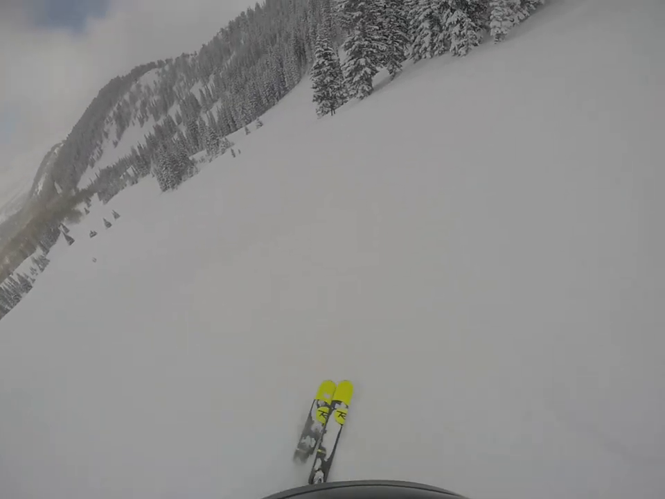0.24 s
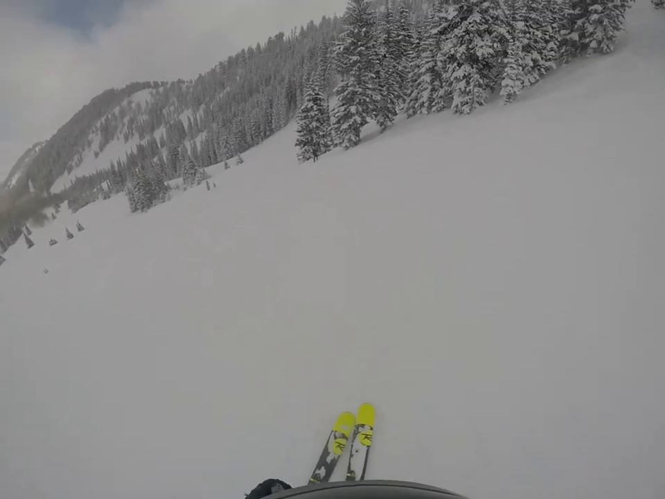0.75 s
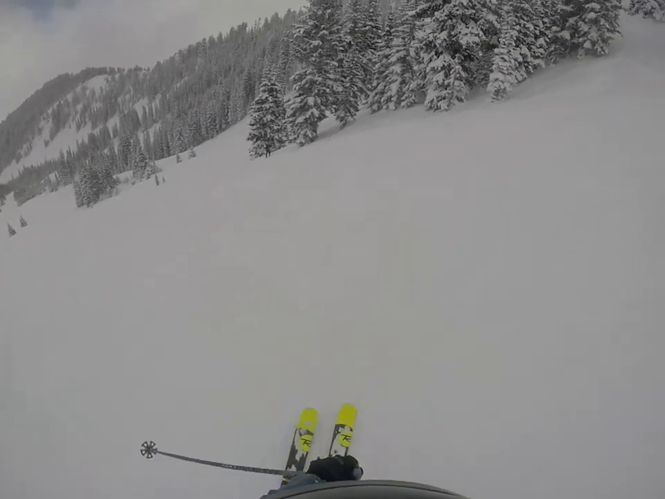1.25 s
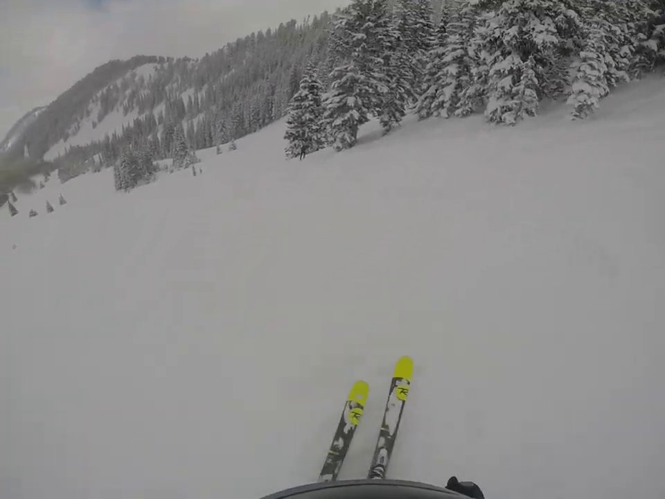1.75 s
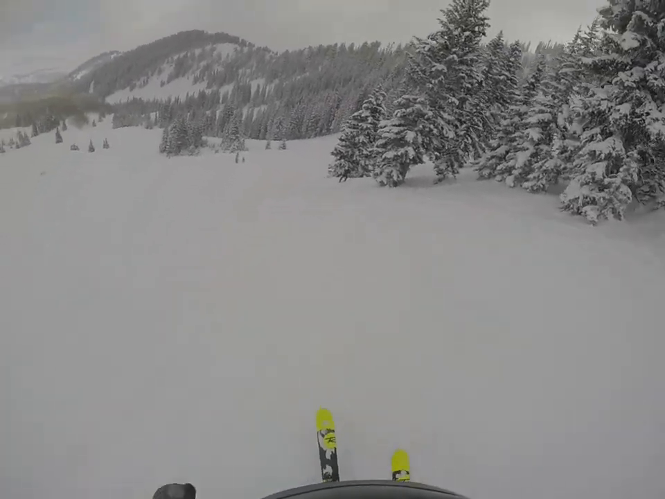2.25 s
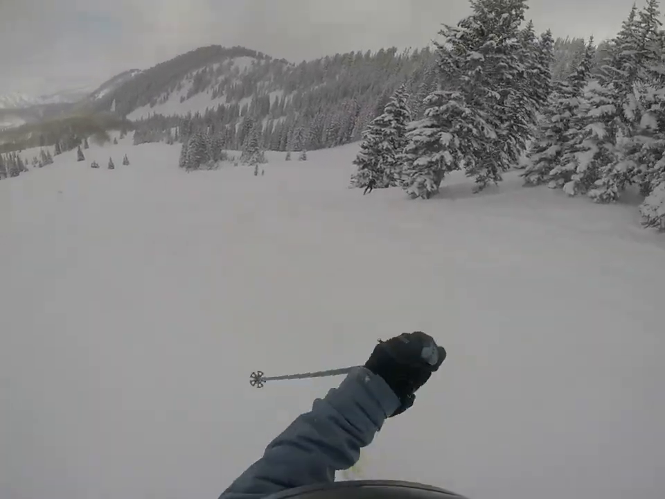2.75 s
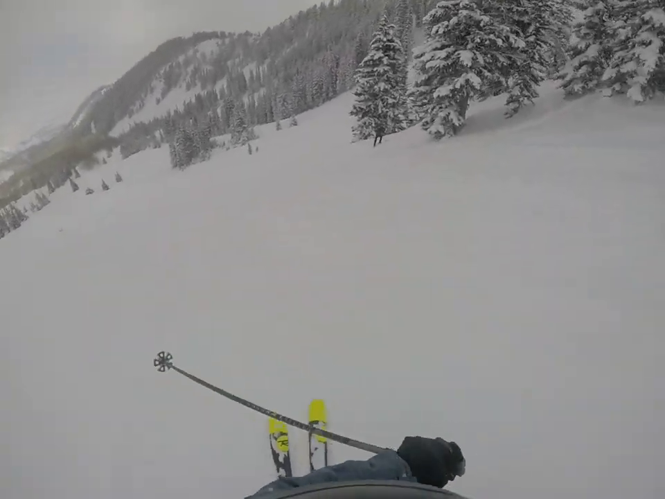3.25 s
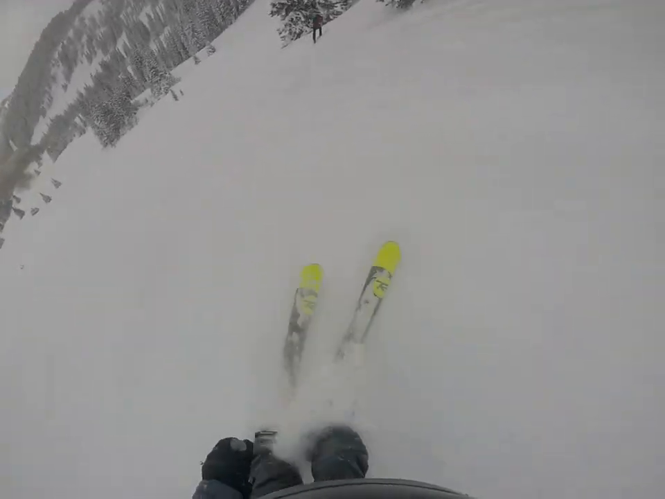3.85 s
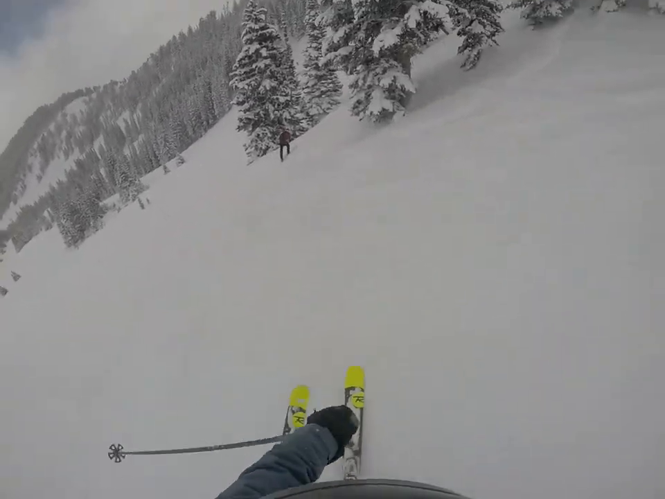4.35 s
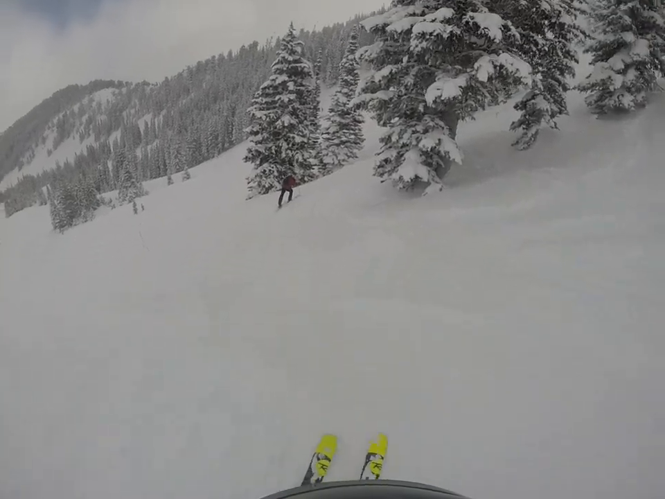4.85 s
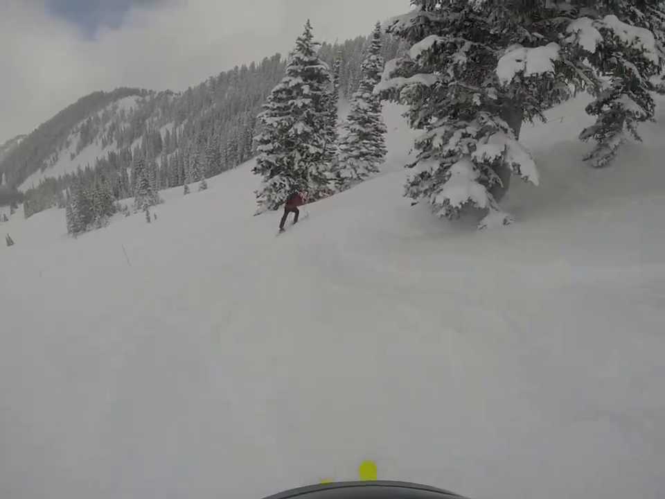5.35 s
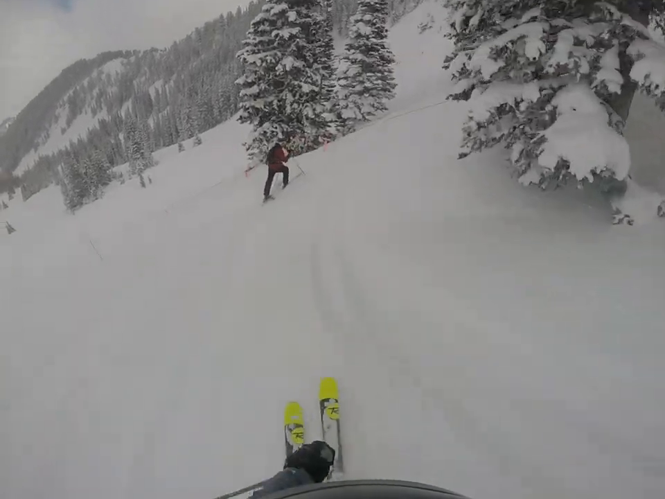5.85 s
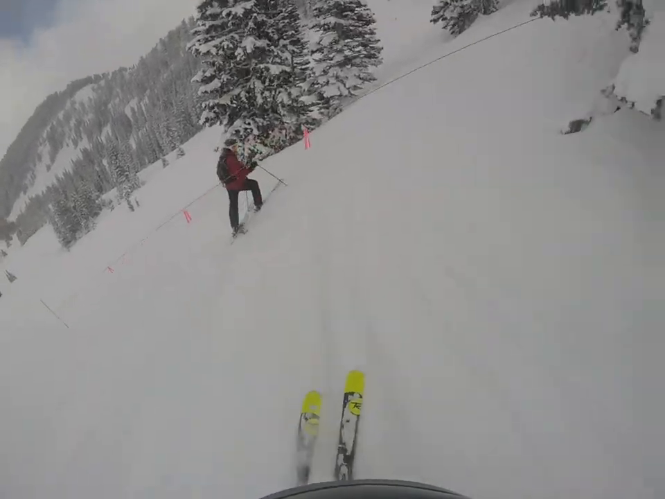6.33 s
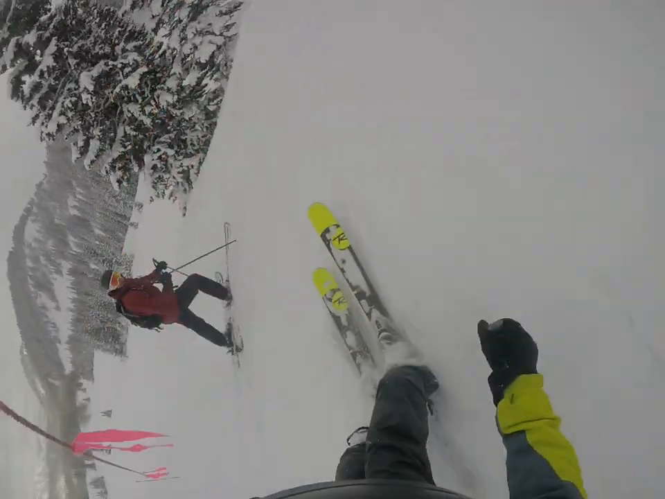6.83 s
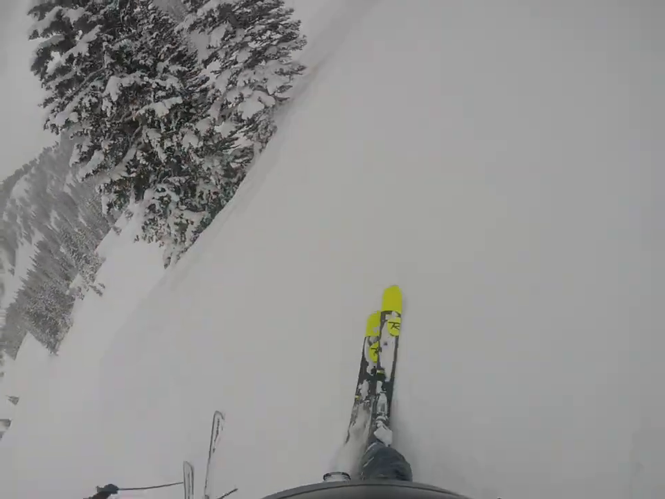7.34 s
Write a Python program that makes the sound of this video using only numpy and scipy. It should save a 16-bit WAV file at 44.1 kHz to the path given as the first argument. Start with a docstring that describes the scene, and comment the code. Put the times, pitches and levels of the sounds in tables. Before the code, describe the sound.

Muffled snow spray rushes and thins over rumbling, thudding wind, dotted with tiny sharp clicks; the hiss nearly vanishes before a small binding knock.

```python
"""On an open snowy slope, skis run through deep powder, heard by a microphone in a closed camera housing on a helmet.
Sprayed snow is a dense rain of random grains, coloured by the hollow of the housing.
Wind is slow and quick noise swelling into thumps on the wall; rushing air adds a rush, drone, whistle and hiss.
Ice crystals and the mount tick against the plastic by setting its rings going, and near the end
the ski binding knocks, made the same way with its own ringing pitches."""
import sys
import numpy as np
from scipy import signal
from scipy.fft import rfft, irfft, next_fast_len
from scipy.io import wavfile
from scipy.ndimage import uniform_filter1d

SR = 44100
rng = np.random.default_rng(int(sys.argv[2]) if len(sys.argv) > 2 else 0)


def wav_out(sig):
    """Save sig, one row per channel (or a flat mono array), as 16-bit PCM at SR to the path in sys.argv[1]."""
    wavfile.write(sys.argv[1], SR, np.round(np.clip(np.atleast_2d(sig).T, -1, 1) * 32767).astype(np.int16))


def ratio_of_db(decibels):
    """Turn decibels (scalar or array-like) into linear amplitude factors; 0 dB maps to 1."""
    return 10 ** (np.asarray(decibels, float) / 20)


N = 334719

# How the snow spray changes. Each row: time in seconds, hiss level in dB, brightness (treble boost) in dB.
SPRAY_OVER_TIME = [(0.0, -42.5, -1), (0.19, -43.5, 2.5), (0.33, -37.5, 3), (0.56, -44.5, 1.5),
                   (0.74, -41, 0.5), (1.15, -43, 1.5), (1.38, -47, -3), (1.5, -53, 0), (1.56, -52, 8),
                   (1.58, -45.5, -1.5), (1.85, -49.5, 3), (2.45, -47, -2), (2.94, -43, 0.5), (3.1, -42, 1),
                   (3.38, -36.5, 1), (3.6, -47.5, 2), (3.72, -39.5, 0.5), (3.85, -45.5, 1),
                   (3.92, -60.5, 7), (4.05, -62.5, -3), (4.14, -52, -3.5), (4.47, -59.5, -7),
                   (4.62, -48.5, -11), (4.87, -49, 0), (5.32, -55.5, 0.5), (5.72, -47.5, -2),
                   (5.9, -48, -5), (5.97, -56, 0), (6.23, -47.5, -2), (6.46, -55, -2.5), (6.94, -59, 2),
                   (7.0, -67.5, 4), (7.59, -69.5, 5)]


def rms_one(x):
    """Scale a sound so that its rms (average strength) is 1."""
    return x / np.sqrt(np.mean(x ** 2) + 1e-20)


def in_time(rows):
    """Draw straight lines between the rows of a table: one value per sample for each column."""
    s, *columns = np.transpose(rows)
    return [np.interp(np.arange(N) / SR, s, column) for column in columns]


def coloured(x, spectrum):
    """Make some pitches louder than others, following (Hz, dB) points; the result has rms 1."""
    hz, db = np.transpose(spectrum)
    size = next_fast_len(N)
    bins_hz = np.arange(size // 2 + 1) * SR / size + 1e-3   # the small offset avoids log(0)
    gain_db = np.interp(np.log(bins_hz), np.log(hz), db, left=-140, right=-140)
    return rms_one(irfft(rfft(x, size) * ratio_of_db(gain_db), size)[:N])


def drift(rate_hz):
    """Slow random wandering: noise passed twice through a simple low-pass at rate_hz; spread about 1."""
    r = np.exp(-2 * np.pi * rate_hz / SR)
    noise = rng.standard_normal(N + SR)
    return rms_one(signal.lfilter([1], [1, -2 * r, r * r], noise)[SR:])   # skip the settling second


def ring(clicks, hz, t60):
    """A resonator: each unit click starts a sine of height 1 that fades by 60 dB in t60 seconds."""
    r, w = ratio_of_db(-60 / (t60 * SR)), 2 * np.pi * hz / SR
    return signal.lfilter([0, np.sin(w)], [1, -2 * r * np.cos(w), r * r], clicks + 1e-18)


def struck(clicks, hz, t60):
    """A soft contact: the swing builds up over a cycle or two to a peak as high as the click."""
    soften = signal.butter(2, [hz / 1.2, hz * 1.2], "band", fs=SR, output="sos")
    one_strike = ring(signal.sosfilt(soften, signal.unit_impulse(400)), hz, t60)
    peak = np.abs(one_strike).max()
    return ring(signal.sosfilt(soften, clicks + 1e-18), hz, t60) / peak


def spray(grains_per_s=6000, grain_db=2.0, clump_db=1.0, mid_share=.4):
    """Dense snow grains of uneven size arrive in clumps; the housing colours them and their treble varies."""
    # Spray as coloured by the housing. Each row: pitch in Hz, relative level in dB.
    spray_colour = [(700, -25.5), (1150, -19), (1450, -9), (1690, -1), (1850, 1), (2200, -5), (2450, -7.5),
                    (2630, -6.5), (3150, -15.5), (3450, -13), (4000, -29), (4850, -24.5), (5800, -25),
                    (6300, -31.5), (8300, -45), (15500, -66)]
    hiss_db, bright_db = in_time(SPRAY_OVER_TIME)
    sizes = ratio_of_db(grain_db * np.minimum(rng.exponential(1, N), 5)) * rng.choice([-1, 1], N)
    grains = sizes * (rng.random(N) < grains_per_s / SR)
    clumps = ratio_of_db(clump_db * drift(90) + .6 * drift(14))
    hiss = coloured(grains * clumps, spray_colour)
    # split into three bands so that brightness can act on the upper two
    above = [signal.sosfiltfilt(signal.butter(3, hz, "high", fs=SR, output="sos"), hiss)
             for hz in (2350, 4000)]
    core, mid, top = hiss - above[0], above[0] - above[1], above[1]
    return ratio_of_db(hiss_db) * (core + ratio_of_db(mid_share * bright_db) * mid + ratio_of_db(bright_db) * top)


def wind(push_s=0.11, buffet_s=0.03, evenness=0.61):
    """Turbulence pushes the housing wall; gusts set the swing, so the noise's own swells are partly evened out."""
    # Steady wind. Each row: time in seconds, slow push in dB, quick buffeting in dB.
    steady_wind = [(0.0, -42, -49), (0.8, -41, -40.5), (2.0, -45.5, -51.5), (3.5, -38.5, -51),
                   (4.4, -42, -51), (5.2, -44.5, -51), (6.0, -49, -56.5), (7.59, -45.5, -53)]
    # Gusts that thump. Each row: middle in seconds, slow push in dB, quick buffeting in dB, length in seconds.
    gust_thumps = [(0.044, -34.5, -49, 0.069), (0.39, -36.5, -37.5, 0.12), (0.552, -33.5, -37.5, 0.051),
                   (0.76, -41, -37, 0.17), (1.015, -40.5, -41, .1), (1.227, -32, -52, 0.055),
                   (1.602, -34, -33.5, .14), (1.76, -29, -35, 0.11), (2.08, -33.5, -39, .08),
                   (2.414, -40, -46, 0.15), (2.614, -34, -40.5, 0.15), (2.876, -35, -34, 0.044),
                   (3.022, -39.5, -38.5, .06), (3.477, -38.5, -37, 0.11), (3.608, -27, -41, 0.046),
                   (3.744, -34.5, -40, 0.076), (3.848, -35, -32.5, 0.13), (4.054, -42, -41.5, 0.052),
                   (4.168, -40, -44.5, 0.06), (4.33, -35, -43.5, 0.13), (4.558, -49, -44, 0.22),
                   (4.862, -39, -46, 0.051), (5.05, -43, -42, 0.099), (5.386, -31, -39, 0.046),
                   (5.487, -39, -39, 0.093), (5.748, -36.5, -42.5, 0.09), (6.176, -36, -48, 0.084),
                   (6.303, -37.5, -34.5, .08), (6.426, -33.5, -45, .1), (6.85, -37, -56, 0.14),
                   (7.024, -45, -45.5, 0.069), (7.13, -34.5, -51, 0.063), (7.22, -29.5, -47.5, 0.072),
                   (7.373, -41, -62, 0.069)]
    # Colours of the slow push and the quick buffeting. Each row: pitch in Hz, relative level in dB.
    push_colour = [(2, 11), (6, 13.5), (18, -3), (32, 5), (60, -59), (120, -80)]
    buffet_colour = [(15, -26), (30, -4), (47, 7.5), (60, -7), (75, -20), (110, -47), (300, -90)]
    swells_db = 2 * drift(5.7)   # chance swells of the steady wind
    t = np.arange(0, N, 64) / SR   # a coarse clock is enough for the gusts
    s, *thump_db, length = np.transpose(gust_thumps)
    bells = np.exp(-(2 * (t[:, None] - s) / length) ** 2)   # each gust swells and fades as a bell curve
    out = 0
    parts = zip(in_time(steady_wind), thump_db, (push_colour, buffet_colour), (push_s, buffet_s))
    for db, peak_db, colour, span_s in parts:
        lumps = coloured(rng.standard_normal(N), colour)
        span = int(span_s * SR)
        swell = uniform_filter1d(uniform_filter1d(lumps ** 2, span), span) + .01
        evened = rms_one(lumps / swell ** (evenness / 2))
        thumps = np.interp(np.arange(N) / SR, t, bells @ ratio_of_db(peak_db))
        out = out + np.hypot(ratio_of_db(db + swells_db), thumps) * evened
    return out


def air(flicker_db=1.2):
    """Air rushing past the helmet: smooth rush, faint drone of the mount, thin housing whistle, hiss on top."""
    # Each row: time in seconds, rush in dB, thin whistle in dB, treble hiss in dB.
    air_levels = [(0.0, -57, -77, -75.5), (3.6, -57.5, -74, -74.5), (4.3, -61, -71, -76.5),
                  (6.6, -59.5, -74.5, -76), (7.06, -62.5, -67.5, -73), (7.59, -61.5, -69, -75.5)]
    # Colours of the three noises. Each row: pitch in Hz, relative level in dB.
    rush_colour = [(60, -15), (100, 0), (170, -0.5), (270, -4.5), (440, -6.5), (650, -10), (1200, -12),
                   (2000, -18.5), (3000, -23.5), (3900, -20), (6000, -72), (9000, -56)]
    whistle_colour = [(2500, -1), (3900, -8), (4850, -0.5), (5800, -9.5), (6600, -10.5), (9000, -38)]
    treble_colour = [(3000, -16), (7000, 1), (8300, -1), (9700, -3.5), (11500, -4), (14600, -9.5),
                     (15600, -25)]
    rush_db, whistle_db, treble_db = in_time(air_levels)
    hum = ring(rng.standard_normal(N), 138, 1.6 / 7.0)
    # the drone wavers, and grows 0.43 dB for each dB of spray
    hum_db = 2.5 * drift(1.1) + 0.43 * in_time(SPRAY_OVER_TIME)[0]
    drone = rms_one(hum * ratio_of_db(hum_db))
    rush = coloured(rng.standard_normal(N), rush_colour) + ratio_of_db(-10) * drone   # drone 10 dB below the rush
    whistle = coloured(rng.standard_normal(N) * ratio_of_db(flicker_db * drift(28)), whistle_colour)
    treble = coloured(rng.standard_normal(N) * ratio_of_db(flicker_db * drift(30)), treble_colour)
    return ratio_of_db(rush_db) * rush + ratio_of_db(whistle_db) * whistle + ratio_of_db(treble_db) * treble


def ticks(stray_colour_db=2.5, crumble_s=.0005):
    """Each tick strikes the rings near its own pitch hardest; neighbouring rings swing opposite."""
    # Ticks on the housing. Each row: start in seconds, strike level at the pitch in dB, strongest pitch in Hz,
    # fall away from it in dB per octave, least strike level above the pitch (a broad snap) in dB.
    tick_rows = [(0.2494, -34.5, 4700, 20, -51), (0.3672, -44, 6200, 25, -51.5),
                 (0.4455, -35, 5900, 30, -57), (0.54, -40, 6200, 30, -52), (0.6681, -34.5, 2800, 5.5, -43),
                 (0.7944, -44, 4700, 12, -54), (0.8688, -45, 6300, 30, -57), (1.1473, -48, 6000, 15, -54),
                 (1.162, -32.5, 4800, 22.5, -54), (1.2296, -38, 6200, 14, -41),
                 (1.2922, -41, 2800, 5.5, -52), (1.3741, -19.5, 4700, 31, -43),
                 (1.5238, -53.5, 13000, 4, -60), (1.6994, -40, 4000, 15, -53), (1.729, -50, 5000, 6, -54),
                 (1.7695, -52, 4500, 10, -58), (1.8722, -38.5, 4700, 6, -42),
                 (2.0402, -31, 3500, 10.5, -43), (2.0438, -46, 6500, 10, -54), (2.169, -36, 2700, 14, -56),
                 (2.298, -42, 6300, 30, -51), (2.3735, -45, 4700, 20, -46), (2.3918, -40, 6000, 12, -50),
                 (2.4385, -41, 3000, 10, -62), (2.4453, -43, 5400, 17, -59), (2.527, -42.5, 4800, 15, -58),
                 (2.593, -49, 6000, 14, -59), (2.9054, -43, 5500, 25, -75), (3.175, -44, 5400, 13.5, -57),
                 (3.262, -53.5, 6200, 15, -54), (3.4288, -44, 11500, 25, -50), (3.478, -46, 6300, 30, -57),
                 (3.5523, -47, 4700, 16, -49), (3.5799, -49, 13000, 6, -50), (3.6783, -42, 2700, 13, -60),
                 (3.736, -38.5, 6200, 8, -43), (3.8274, -46, 6200, 16, -60), (3.9025, -46.5, 6100, 30, -68),
                 (4.2128, -51.5, 6000, 4, -55), (4.3973, -45.5, 3000, 12, -75),
                 (4.6846, -54.5, 6000, 6, -55), (4.694, -42.5, 4800, 11, -55),
                 (4.8692, -32.5, 2690, 10.5, -36.5), (4.9993, -33, 4900, 10.5, -43),
                 (5.209, -40.5, 2720, 12.5, -64), (5.233, -44.5, 2700, 8.5, -61),
                 (5.423, -43, 3500, 14.5, -75), (5.644, -30, 4600, 28, -50), (5.8875, -35, 6900, 22, -59),
                 (6.2417, -38, 6200, 24, -38.5), (6.6641, -47, 5500, 8.5, -56.5),
                 (6.9576, -45.5, 6400, 14, -52), (7.005, -48, 4600, 30, -72), (7.0786, -47, 11500, 14, -52),
                 (7.232, -48, 5200, 26, -78), (7.342, -53.5, 3500, 6, -62)]
    # Rings of the housing. Each row: pitch in Hz, level added to every strike in dB, 60 dB fade in seconds.
    housing_rings = [(2510, 3, 0.0063), (3360, 0, 0.002), (4390, -9.5, 0.0078), (4910, 0.5, 0.0039),
                     (5785, -2, 0.0056), (6570, -9.5, 0.0097), (7380, -1.5, 0.0014), (9520, 0.5, 0.0018),
                     (12140, -2.5, 0.0036), (14400, -4.5, 0.0033)]
    s, peak_db, pitch_hz, fall_db, snap_db = np.transpose(tick_rows)
    hiss_db = in_time(SPRAY_OVER_TIME)[0]
    scatter_db = rng.standard_normal((len(s), len(housing_rings)))
    # a crumbling crystal does not hit all rings at once
    late = crumble_s * rng.random((len(s), len(housing_rings)))
    at = np.round((s[:, None] + late) * SR).astype(int)
    # fainter crystals at random: 17 per second at the mean hiss level in dB, more in thick spray
    stray_per_s = 17 * ratio_of_db(.6 * (hiss_db - hiss_db.mean()))
    stray = np.flatnonzero(rng.random(N) < stray_per_s / SR)
    stray_db = -73 + 4.5 * np.minimum(rng.exponential(1, len(stray)), 3)
    out = np.zeros(N)
    for k, (hz, db, t60) in enumerate(housing_rings):
        clicks = np.zeros(N)
        octaves = np.log2(hz / pitch_hz)
        above_db = np.maximum(peak_db - fall_db * octaves, snap_db)
        below_db = peak_db + 1.23 * fall_db * octaves   # the fall is steeper below the pitch
        strike_db = np.where(octaves > 0, above_db, below_db)
        clicks[stray] = ratio_of_db(stray_db + db + stray_colour_db * rng.standard_normal(len(stray)))
        clicks[at[:, k]] = ratio_of_db(strike_db + db + scatter_db[:, k])
        out += (-1) ** k * struck(clicks, hz, t60)
    return out


def knocks():
    """A knock sets the ringing pitches (modes) of the binding going; its brightness tilts their levels."""
    # Each row: start in seconds, strike level at the lowest mode in dB, brightness in dB per octave above it.
    knock_rows = [(7.3867, -42, 3.5), (7.3892, -33.5, -12), (7.414, -48, -3), (7.4172, -45, -14)]
    # Modes of the binding. Each row: pitch in Hz, level added to every strike in dB, 60 dB fade in seconds.
    binding_modes = [(1490, -8, 0.011), (1820, -3.5, 0.015), (2120, -11, 0.011), (2630, -10, 0.01),
                     (3440, -5.5, 0.0056), (4720, -9, 0.011), (5640, -10, 0.0054)]
    s, peak_db, bright_db = np.transpose(knock_rows)
    at = np.round(s * SR).astype(int)
    lowest_hz = binding_modes[0][0]
    out = np.zeros(N)
    for k, (hz, db, t60) in enumerate(binding_modes):
        clicks = np.zeros(N)
        clicks[at] = ratio_of_db(peak_db + db + bright_db * np.log2(hz / lowest_hz))
        out += (-1) ** k * struck(clicks, hz, t60)   # neighbouring modes swing opposite
    return out


def scene():
    """Open slope in soft snow: all the layers are added, with no echoes, into one channel."""
    return (spray() + wind() + air() + ticks() + knocks())[None, :]


def low_pass(x):
    """Removes everything above the highest recorded frequency."""
    return signal.sosfilt(signal.butter(12, 16500, fs=SR, output="sos"), x)


def record(dry, top_hz=15600):
    """The microphone path rolls off steeply at the top."""
    rolled = signal.sosfilt(signal.butter(8, top_hz, fs=SR, output="sos"), dry)
    return low_pass(rolled)


dry = scene()
out = record(dry)
wav_out(out)
```